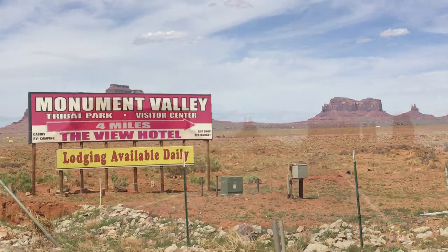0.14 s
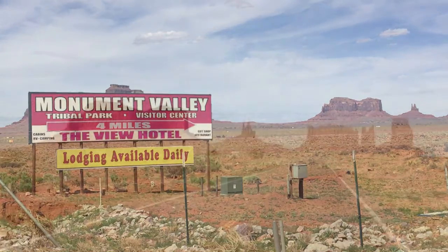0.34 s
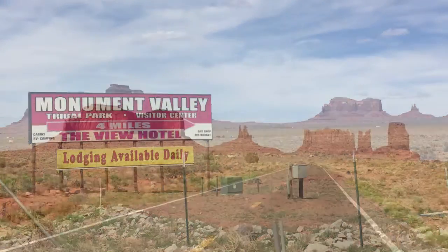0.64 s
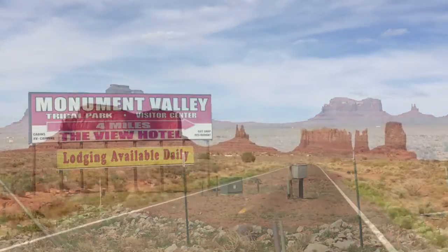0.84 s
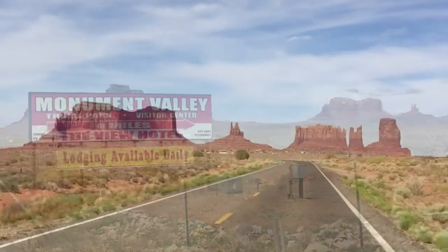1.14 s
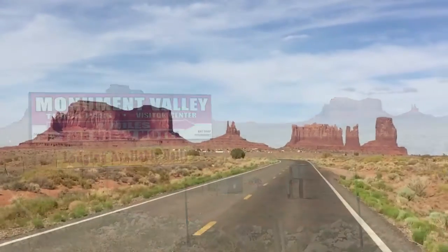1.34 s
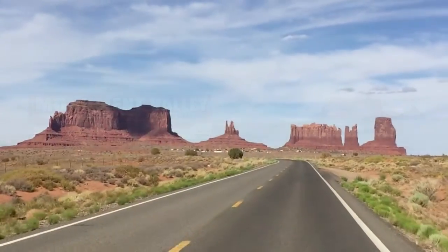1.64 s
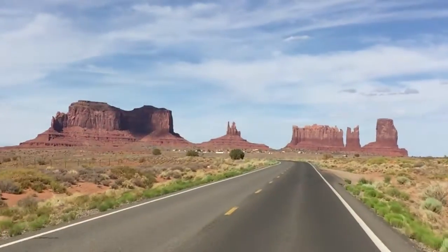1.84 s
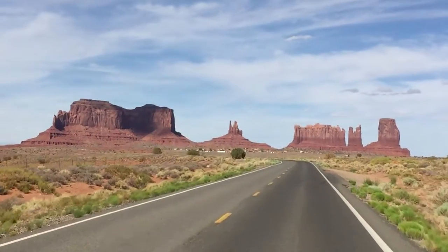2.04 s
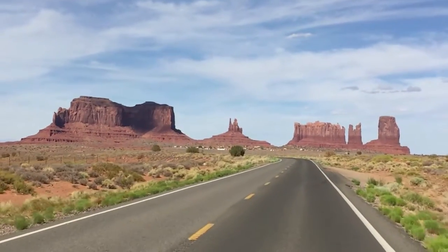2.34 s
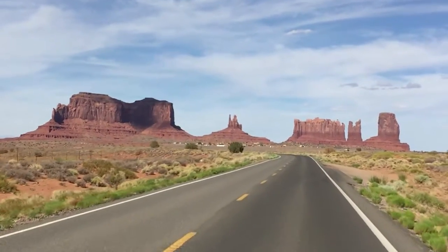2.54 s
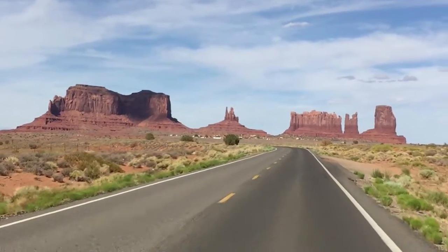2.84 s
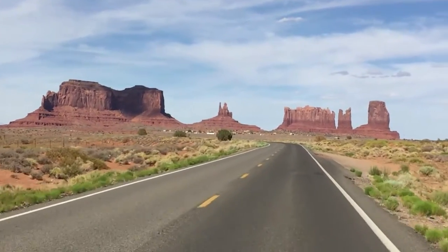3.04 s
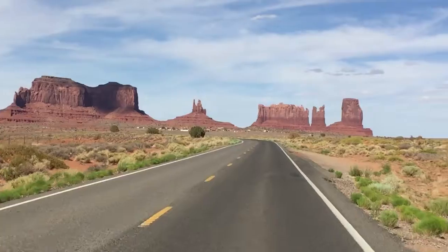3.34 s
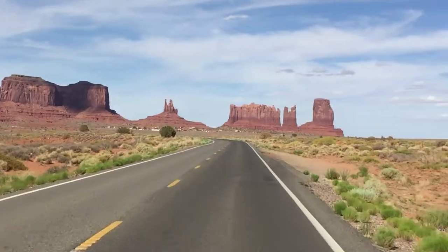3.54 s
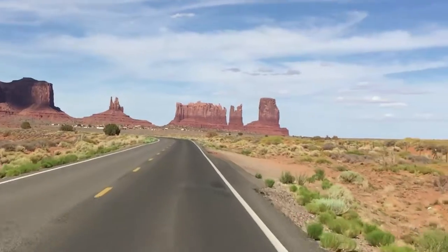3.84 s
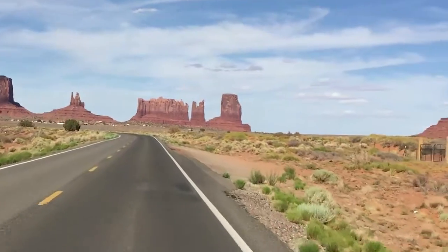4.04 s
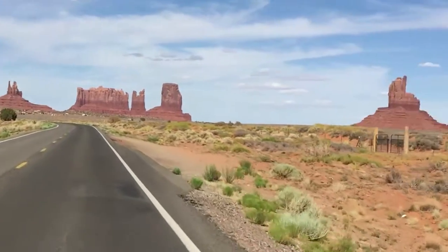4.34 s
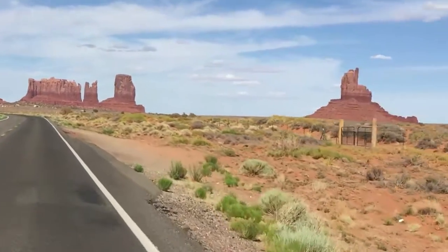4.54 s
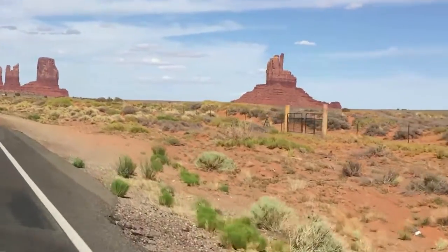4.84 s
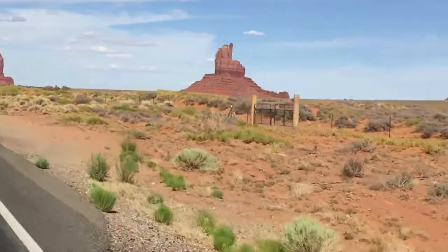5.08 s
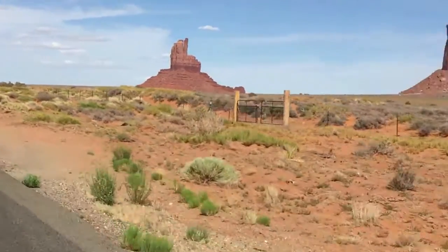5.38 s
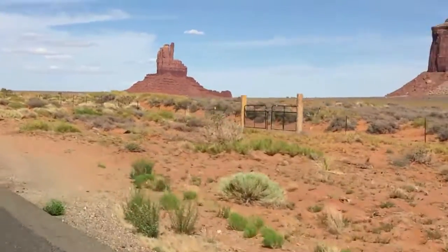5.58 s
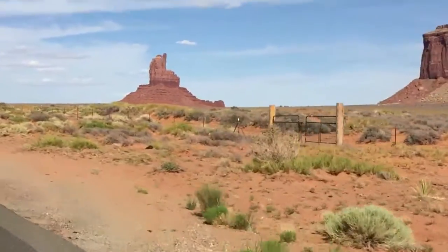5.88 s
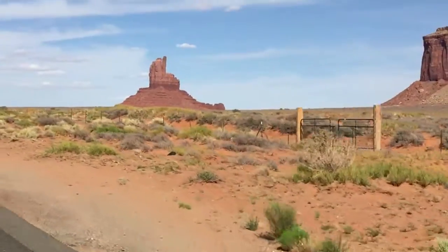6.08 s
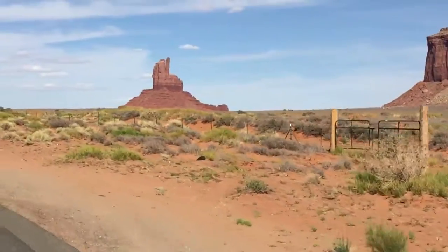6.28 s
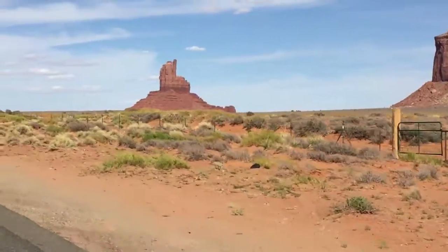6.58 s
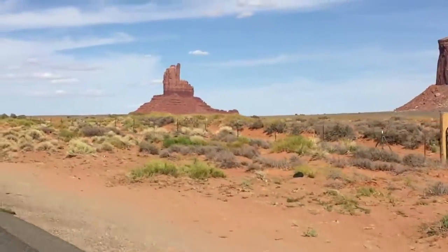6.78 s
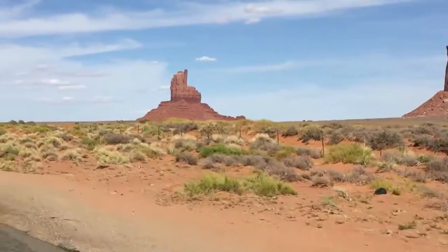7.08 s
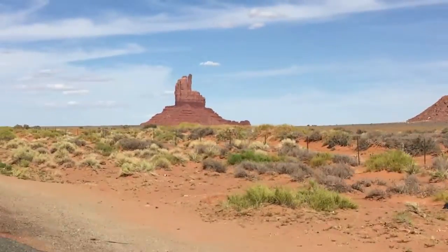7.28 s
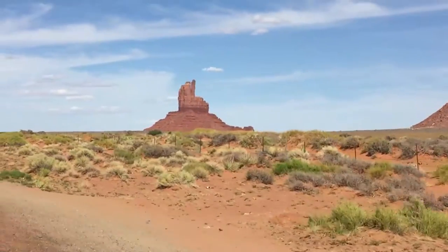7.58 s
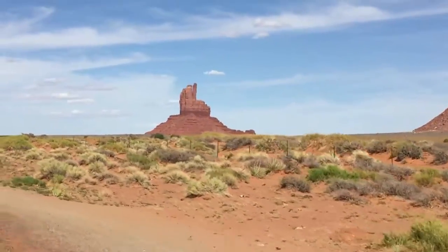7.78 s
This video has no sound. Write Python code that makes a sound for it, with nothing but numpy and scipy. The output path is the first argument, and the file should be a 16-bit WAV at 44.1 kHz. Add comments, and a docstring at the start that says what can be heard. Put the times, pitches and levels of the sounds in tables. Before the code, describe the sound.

From near silence a motorcycle cruising on an open desert road fades in, heard from the saddle: deep even exhaust throb, thin gear whine, tyre rush, bright engine hiss and low headwind, with a few small knocks. Past the middle the sound abruptly dulls and dips, then ragged wind gusts slap and crackle on the microphone over the weakened engine.

```python
"""On an open road, a V-twin motorcycle cruises along, heard from the saddle; the sound fades in.
The exhaust throb is a stack of steady tones tied to the engine speed, and so are the thin gear whines.
Tyre rush, engine hiss and headwind rumble are coloured noise; small knocks are dying tones.
Then the microphone swings to the side: the sound turns duller at once, the level dips and climbs back,
and wind buffets it in ragged gusts made of noise, tiny random pops and sharp dips of pressure."""
import sys
import numpy as np
from scipy import signal
from scipy.fft import rfft, irfft, next_fast_len
from scipy.io import wavfile
from scipy.ndimage import uniform_filter1d, minimum_filter1d

SR = 44100
rng = np.random.default_rng(int(sys.argv[2]) if len(sys.argv) > 2 else 0)


def to_wav(s):
    """Save 16-bit WAV."""
    ch = np.atleast_2d(s).T  # columns
    pcm = np.round(np.clip(ch, -1, 1) * 32767)  # PCM
    wavfile.write(sys.argv[1], SR, pcm.astype(np.int16))


N = 349124
TIME = np.arange(N) / SR
TURN_S = 4.392    # the microphone swings to the side

# Engine speed, a slight surge and then easing off.
# Each row: time in seconds, four-stroke cycles per second.
SPEED = [(1.7, 19.28), (3.3, 19.352), (4.6, 19.28), (6.3, 19.19), (7.45, 19.0), (7.92, 19.12)]


def from_db(db):
    """Turn decibels into a gain."""
    return 10 ** (np.asarray(db) / 20)


def rms_one(x):
    """Scale a signal so that its rms (its average strength) is 1."""
    return x / np.sqrt(np.mean(x ** 2) + 1e-20)


def in_time(rows):
    """Draw straight lines between the rows of a curve: one value per sample for each column after the time."""
    seconds, *columns = np.transpose(rows)
    return [np.interp(TIME, seconds, column) for column in columns]


def ramp(start_s, length_s):
    """Climb in a straight line from 0 to 1."""
    return np.clip((TIME - start_s) / length_s, 0, 1)


def turn_to_side():
    """Swing from 0 (facing forward) to 1 (facing sideways) in a hundredth of a second."""
    return np.clip((TIME - TURN_S) / .01 + .5, 0, 1)


def colour(x, spectrum):
    """Filter a signal by a spectrum, then scale it to unit rms."""
    size = next_fast_len(N)
    hz, db = np.transpose(spectrum)
    bins_hz = np.maximum(np.arange(size // 2 + 1) * SR / size, 1)
    gain = from_db(np.interp(np.log(bins_hz), np.log(hz), db))
    filtered = irfft(rfft(x, size) * gain, size)
    return rms_one(filtered[:N])


def noise(spectrum):
    """Make smooth noise of a given colour."""
    return colour(rng.standard_normal(N), spectrum)


def drift(rate_hz):
    """Wander at random, faster for a higher rate, with unit rms."""
    r = np.exp(-2 * np.pi * rate_hz / SR)
    # the first second is thrown away while the filter settles
    wander = signal.lfilter([1], [1, -2 * r, r * r], rng.standard_normal(N + SR))
    return rms_one(wander[SR:])


def swell(start_s, length_s, rise_s, fall_s):
    """Shape one push of air: it rises, holds for its length and dies away."""
    age = TIME - start_s
    rise = np.clip(age / rise_s + .5, 0, 1)
    fall = np.exp(-np.clip((age - length_s) / fall_s, 0, 20))
    return rise * fall


def bell(centre_s, half_s):
    """Make a smooth hump of height 1."""
    return np.exp(-np.minimum(((TIME - centre_s) / half_s) ** 2 / 2, 20))


def exhaust(cycle, uneven_db=0.5, flutter=0.13):
    """Two unevenly spaced firings and the ringing pipes time the harmonics, so the throb swells and dies."""
    # Exhaust note. Each row: multiple of the cycle rate, rms level in dB before the changes below.
    harmonics = [(2, -39), (3, -25), (4, -24), (5, -19), (6, -28), (7, -30), (8, -34.5), (9, -34),
                 (10, -30), (11, -42), (12, -38), (14, -49), (15, -50), (16, -47), (19, -42.5), (20, -44),
                 (21, -45)]
    # Resonances of pipe and silencer. Each row: pitch in Hz, width in Hz.
    resonances = [(103, 26), (111, 16)]
    # Changing level of the upper harmonics. Each row: time in seconds, change in dB.
    upper_curve = [(2.6, -5), (3.05, 0.5), (4.39, -0.5)]
    upper_from_order = 14
    firing_gap = 315 / 720    # delay of the rear cylinder, as a share of a cycle
    rear_share = .25          # strength of the rear cylinder against the front
    upper_db, = in_time(upper_curve)
    out = np.zeros(N)
    for order, db in harmonics:
        hz = order * SPEED[0][1]
        response = 1 + rear_share * np.exp(-2j * np.pi * order * firing_gap)
        for pipe_hz, width_hz in resonances:
            response = response / (1 + 1j * (hz ** 2 - pipe_hz ** 2) / (hz * width_hz))
        # only the timing (phase) comes from the response; the table sets the level
        phase = 2 * np.pi * order * cycle + np.angle(response)
        waver = 1 + flutter * order / 10 * drift(5.7)    # moving air disturbs the high orders most
        level_db = db + upper_db * (order >= upper_from_order)
        out += from_db(level_db) * waver * np.sqrt(2) * np.cos(phase)
    return out * from_db(uneven_db * drift(24))    # no two burns are alike


def road(cycle, throb_db=-0.5, patchy_db=1.3):
    """Tyres and passing air rush as coloured noise, swelling a little with each engine cycle."""
    # Colour of the rush. Each row: frequency in Hz, level in dB per Hz.
    rush_spectrum = [(40, -27), (150, -11.5), (260, -14), (330, -17.5), (470, -20.5), (620, -17),
                     (830, -26), (1050, -20.5), (1350, -23.5), (2000, -30.5), (2430, -34), (2620, -41.5),
                     (15000, -72)]
    return noise(rush_spectrum) * from_db(throb_db * np.sin(2 * np.pi * cycle) + patchy_db * drift(50))


def engine_chatter(cycle):
    """The engine hiss pulses once per cycle, and wavers at random."""
    hiss_peak = .04    # where in the cycle the hiss is strongest, as a share of a cycle
    pulse = np.cos(2 * np.pi * (cycle - hiss_peak))
    return from_db(1.0 * drift(60) + 0.83 * pulse)


def engine_hiss(chatter, hiss_db=-45):
    """The engine hisses as bright noise that pulses with its chatter."""
    # Colour of the hiss. Each row: frequency in Hz, level in dB per Hz.
    hiss_spectrum = [(1200, 4.5), (2150, -17), (2400, -6), (2650, -3.5), (3500, 1), (4000, 4.5),
                     (4300, 4.5), (4620, 0.5), (4900, -7.5), (5230, -1), (5900, -8), (6380, -9.5),
                     (6550, -2.5), (6720, -11), (8000, -9.5), (8800, -13), (9400, -11), (10500, -21),
                     (11200, -11.5), (12000, -11), (13500, -19), (15700, -20)]
    return from_db(hiss_db) * chatter * noise(hiss_spectrum)


def whines(cycle, waver_db=2.5, smear=1.0):
    """Meshing teeth sing at fixed multiples of the engine speed; backlash smears the high ones most."""
    # Gear, chain and valve-train whines. Each row: multiple of the cycle rate, rms level in dB before waver.
    steady_tones = [(23, -54), (26, -52), (28, -53), (30, -51), (32, -52), (33, -50), (34, -47.5),
                    (37, -54), (38, -53), (48, -57), (52, -53), (55, -55), (66, -54), (68, -50.5),
                    (155.7, -68), (192.5, -65), (205.9, -62), (217.3, -59.5), (222.6, -62.5), (267.9, -68),
                    (313.3, -74), (339, -69), (369.7, -76)]
    # The clearest gear whine as the load eases. Each row: time in seconds, rms level in dB before waver.
    gear_curve = [(1.4, -54.5), (2.0, -54), (2.7, -56), (3.3, -58), (3.8, -56), (4.39, -53.5)]
    # A humming overtone of the engine. Each row: time in seconds, rms level in dB before waver.
    hum_curve = [(1.5, -47), (2.05, -42.5), (2.6, -50), (3.2, -42), (3.8, -42.5), (4.39, -45)]
    gear_order, hum_order = 124.2, 31    # multiples of the cycle rate
    changing_tones = [(gear_order, in_time(gear_curve)[0]), (hum_order, in_time(hum_curve)[0])]
    out = np.zeros(N)
    for order, db in list(steady_tones) + changing_tones:
        phase = 2 * np.pi * order * cycle + smear * order / 200 * drift(14)
        out += from_db(db + waver_db * drift(11.0)) * np.sqrt(2) * np.sin(phase)
    return out


def headwind():
    """Air from ahead rumbles low on the microphone, at a level that follows a curve."""
    # Colour of the rumble. Each row: frequency in Hz, level in dB per Hz.
    headwind_spectrum = [(24, -57), (40, 1), (90, 6), (130, 0.5), (180, -1), (260, -12), (500, -51)]
    # Each row: time in seconds, rms level in dB.
    headwind_curve = [(1.5, -28.5), (2.6, -28), (3.0, -25), (3.4, -26), (3.65, -23.5), (4.1, -21.5),
                      (4.39, -24.5)]
    return from_db(in_time(headwind_curve)[0]) * noise(headwind_spectrum)


def pings():
    """Small knocks and metallic pings on the bike are each one dying tone."""
    # Each row: start in seconds, pitch in Hz, starting level in dB, time to fall by 60 dB in seconds.
    knocks = [(2.365, 2920, -41, .11), (2.41, 2640, -43, .11), (2.424, 2430, -38, .11),
              (2.555, 1680, -31.5, .11), (2.79, 420, -20.5, .05), (3.017, 231, -15, .12),
              (3.968, 596, -22, .05)]
    out = np.zeros(N)
    for start_s, hz, db, t60_s in knocks:
        age = np.maximum(TIME - start_s, 0)
        level_db = db - 60 * np.minimum(age / t60_s, 3)
        out += from_db(level_db) * np.sin(2 * np.pi * hz * age)
    return out


def bumps(rise_s=0.00065, fall_s=0.0011):
    """Stray eddies reach the port facing forward: filtered noise bursts knock, thud and flutter."""
    # Each row: start in seconds, length in seconds, level in dB, top edge in Hz.
    stray_eddies = [(2.787, 0.0047, -31, 2090), (2.794, 0.0052, -21, 430), (2.835, 0.014, -27, 1580),
                    (2.867, 0.087, -38, 1700), (3.017, 0.03, -22, 297), (3.242, 0.01, -27, 450),
                    (3.627, 0.005, -25, 790), (3.668, 0.019, -33, 1380), (3.671, 0.013, -24, 420),
                    (3.967, 0.005, -26, 1260), (4.006, 0.025, -28, 420), (4.092, 0.016, -29, 340)]
    low_hz = 156    # lower edge of every bump
    out = np.zeros(N)
    for start_s, length_s, db, top_hz in stray_eddies:
        band = signal.butter(2, [low_hz, max(top_hz, 1.5 * low_hz)], "band", fs=SR, output="sos")
        top = signal.butter(2, top_hz, fs=SR, output="sos")
        push = rng.standard_normal(N) * swell(start_s, length_s, rise_s, fall_s)
        burst = signal.sosfilt(np.vstack([band, top]), push)
        # scale the energy to that of a burst with unit rms over its length
        out += from_db(db) * burst * np.sqrt(length_s * SR / np.sum(burst ** 2))
    return out


def vortices(port_hz=90):
    """The core of a tight vortex sucks briefly at the port: one sharp dip of pressure, heard as a snap."""
    # Each row: time in seconds, depth in dB before the low cut, half width in seconds.
    cores = [(2.7877, -16, 0.00022), (2.796, -7, 0.00076), (2.8402, -24, 0.00021), (3.018, -20, 0.00095),
             (3.0343, -17, 0.00062), (3.6741, -2, 0.00029), (3.9708, -12, 0.0003), (3.974, -20, 0.00037),
             (4.8043, -7, 0.00048), (4.838, -13, 0.00025), (4.8847, -6, .0004), (5.0777, -10, 0.00025),
             (5.1187, -12, 0.00025), (5.3233, -6, .0003), (5.3643, -11, 0.00051), (5.78, -11, 0.0006),
             (5.8647, -12, 0.00013), (5.934, -5, 0.00088), (6.0837, -11, 0.00017), (6.2621, -12, .0003),
             (6.7448, -10, 0.00026), (6.8323, -9, 0.00045), (6.856, -10, 0.00031), (7.1036, -9, 0.00024),
             (7.1283, -6, 0.00018), (7.7472, -13, 0.00026)]
    dips = -sum(from_db(db) * bell(centre_s, half_s) for centre_s, db, half_s in cores)
    low_cut = signal.butter(1, port_hz, "high", fs=SR, output="sos")
    return signal.sosfilt(low_cut, dips)


def side_rush(eddies, windy, lee_db=-30.0, lee_windy_db=-3.5, lee_eddy_db=2.5):
    """Air at the side rushes smoothly as coloured noise, giving way to buffeting as the wind builds."""
    # Colour of the air. Each row: frequency in Hz, level in dB per Hz.
    side_spectrum = [(24, -29), (45, 6.5), (350, 4), (600, 1), (1200, -1.5), (2000, -12.5), (3000, -24.5),
                     (5000, -58), (12000, -74)]
    return from_db(lee_db + lee_windy_db * windy + lee_eddy_db * eddies) * noise(side_spectrum)


def dull_hiss(chatter, dip_db, faint_db=-58, faint_dip=0.65):
    """The engine hiss stays faintly audible at the side, following part of the dip after the turn."""
    # Colour of the faint hiss. Each row: frequency in Hz, level in dB per Hz.
    faint_spectrum = [(2000, -6), (4200, 8.5), (4550, 4.5), (4880, -2), (5200, 4), (6200, -6), (6550, -5),
                      (6800, -9), (8600, -15), (9450, -6), (10400, -12.5), (11250, -7.5), (11700, -12),
                      (12200, -7), (13500, -24), (15500, -18)]
    level_db = faint_db + faint_dip * dip_db + 1.4 * drift(8.7)
    return from_db(level_db) * chatter * noise(faint_spectrum)


def sputter(per_s=1800, smooth_share=0.55):
    """Tiny eddies burst on the port as random pops, over a smoother flow of noise."""
    pops = (rng.random(N) < per_s / SR) * rng.choice([-1, 1], N)
    return rms_one(pops) + smooth_share * rng.standard_normal(N)


def gusts(strength_db=-9.0, breeze_db=-28):
    """Gusts add their power to a steady breeze; the result is the wind strength in dB."""
    # Each row: start in seconds, length in seconds, level in dB before the overall strength is added.
    gust_list = [(4.767, 0.26, -23), (5.075, 0.1, -30), (5.27, 0.048, -17.5), (5.504, 0.14, -15.5),
                 (5.762, 0.032, -19), (5.827, 0.41, -18.5), (6.578, 0.089, -28), (6.818, 0.21, -16.5),
                 (6.98, 0.1, -16.5), (7.443, 0.11, -28), (7.642, 0.14, -18), (7.81, 0.019, -21)]
    rise_s, fall_s = 0.05, 0.015
    power = from_db(breeze_db) ** 2
    for start_s, length_s, db in gust_list:
        power = power + (from_db(db + strength_db) * swell(start_s, length_s, rise_s, fall_s)) ** 2
    return 10 * np.log10(power)


def wind(eddies, rumble_db=-24.5, roar_db=-4.0, eddy_db=4.5, crowding=0.016, tear_db=-35.5, tear_from_db=-18):
    """Eddies cross the microphone port: a lumpy rumble, a ragged roar, and a tearing edge in hard gusts."""
    # Colours of rumble, roar and tearing edge. Each row: frequency in Hz, level in dB per Hz.
    rumble_spectrum = [(24, -45), (40, -0.5), (80, 4.5), (170, -3), (300, -3.5), (500, -17), (900, -29),
                       (2000, -71)]
    roar_spectrum = [(60, -25), (200, 12.5), (400, 8), (700, 7.5), (1050, 4), (1500, -3.5), (2100, -15),
                     (3000, -32), (4500, -65), (7000, -68), (14000, -80)]
    tear_spectrum = [(500, -9), (2200, 14), (3500, 0), (5000, -18.5), (7000, -28), (10000, -50),
                     (15000, -61)]
    gust_db = gusts()
    excess_db = gust_db - np.median(gust_db[TIME > TURN_S])
    rumble = from_db(rumble_db + 0.27 * excess_db + 1.9 * drift(19.5)) * noise(rumble_spectrum)
    grains = sputter()
    ragged_db = eddy_db * (1 - crowding * excess_db)    # in strong gusts the eddies crowd together
    flow = from_db(gust_db + roar_db + ragged_db * eddies)
    # hard eddies steepen into sharp edges, so the treble grows faster than the roar, up to a limit
    edge = from_db(tear_db) * 2 * np.tanh((flow / from_db(tear_from_db)) ** 2 / 2)
    return rumble + flow * colour(grains, roar_spectrum) + edge * colour(grains, tear_spectrum)


def slaps(slap_db=-0.65, slap_edge_db=2.5, crackle_db=3.0):
    """Each buffet of side wind strikes abruptly, holds and is gone: quick cracks, roaring and tearing."""
    # Each row: start in seconds, length in seconds, roar in dB, tearing edge in dB (both before the trims).
    buffets = [(4.777, 0.018, -21.5, -50), (4.824, 0.0032, -20, -42), (4.833, 0.03, -22.5, -41.5),
               (4.867, 0.031, -19.5, -38), (4.91, 0.017, -26, -47), (4.929, 0.011, -20, -48),
               (4.97, 0.031, -23, -49), (5.075, 0.025, -21.5, -49), (5.11, 0.021, -20.5, -50),
               (5.159, 0.01, -26.5, -53), (5.303, 0.0093, -22, -55), (5.314, 0.015, -23, -41.5),
               (5.339, 0.04, -22, -50), (5.472, 0.0063, -26, -51), (5.516, 0.0066, -24.5, -48),
               (5.546, 0.0088, -25, -55.5), (5.565, 0.017, -21.5, -44), (5.622, 0.026, -23.5, -49),
               (5.669, 0.014, -25.5, -53), (5.692, 0.0089, -22, -49), (5.71, 0.0056, -22.5, -42.5),
               (5.776, 0.026, -25.5, -46), (5.834, 0.034, -22, -45), (5.88, 0.025, -21.5, -43),
               (5.912, 0.025, -17.5, -40.5), (5.96, 0.0087, -22, -54), (5.98, 0.014, -37, -40.5),
               (6.011, 0.0046, -25, -48), (6.033, 0.0077, -17.5, -42), (6.054, 0.011, -22, -48),
               (6.074, 0.016, -18, -34.5), (6.131, 0.015, -19.5, -42.5), (6.155, 0.042, -23.5, -45.5),
               (6.203, 0.023, -21.5, -46.5), (6.251, 0.023, -22.5, -51), (6.28, 0.017, -23.5, -51),
               (6.377, 0.0048, -27, -59), (6.445, 0.0066, -26, -63), (6.523, 0.0069, -23, -56),
               (6.548, 0.0041, -25, -57), (6.586, 0.0066, -21.5, -55), (6.638, 0.0087, -21, -54),
               (6.665, 0.0049, -18, -56), (6.74, 0.004, -22, -40), (6.797, 0.012, -25.5, -55),
               (6.83, 0.029, -15, -34.5), (6.86, 0.028, -20, -39), (6.903, 0.022, -21, -47),
               (6.938, 0.01, -18, -44), (6.961, 0.0063, -20, -46), (7.024, 0.008, -24, -50),
               (7.045, 0.012, -19, -41), (7.092, .012, -23, -43), (7.097, 0.024, -17, -34),
               (7.122, 0.011, -12, -37), (7.135, 0.02, -23, -49), (7.218, 0.014, -24.5, -67),
               (7.439, 0.013, -21.5, -49), (7.469, 0.007, -21.5, -47), (7.52, 0.01, -21, -64),
               (7.632, 0.013, -20, -46.5), (7.662, 0.012, -23, -53), (7.687, 0.016, -23, -59),
               (7.729, 0.025, -19, -38), (7.83, 0.014, -23, -47.5)]
    # Colours of roar and tearing edge. Each row: frequency in Hz, level in dB per Hz.
    slap_roar_spectrum = [(60, -9.5), (200, 12), (400, 8.5), (700, 6), (1050, 4.5), (1500, -1.5),
                          (2100, -11.5), (3000, -35), (4500, -69)]
    slap_tear_spectrum = [(500, -8.5), (2200, 10), (3500, 0.5), (5000, -15.5), (7000, -24), (10000, -41),
                          (15000, -58)]
    rise_s, fall_s = .0012, .0022
    roar, edge = np.zeros(N), np.zeros(N)
    for start_s, length_s, roar_db, edge_db in buffets:
        push = swell(start_s, length_s, rise_s, fall_s)
        roar = np.maximum(roar, from_db(roar_db) * push)
        edge = np.maximum(edge, from_db(edge_db) * push)
    cracks = sputter(per_s=1000, smooth_share=0.4)
    crackle = from_db(crackle_db * np.minimum(drift(170), 2))
    low = from_db(slap_db) * roar * np.sqrt(crackle) * colour(cracks, slap_roar_spectrum)
    high = from_db(slap_edge_db) * edge * crackle * colour(cracks, slap_tear_spectrum)
    return low + high


def lulls():
    """The side wind lets go of the port for a moment; this is its gain."""
    # Each row: time in seconds, half width in seconds, change in dB.
    lull_list = [(4.812, 0.0045, -9), (4.946, 0.0048, -5), (5.068, 0.0075, -4.5), (5.146, 0.0097, -6.5),
                 (5.297, 0.0036, -3), (5.394, 0.0066, -3), (5.508, .004, 0), (5.663, 0.0036, -4),
                 (5.745, 0.0093, -2.5), (5.828, .005, -6), (5.95, 0.0062, -4), (6.004, 0.0035, -6),
                 (6.055, .004, -3), (6.435, 0.0091, -8), (6.515, 0.0066, -12), (6.735, 0.0042, -3),
                 (6.785, 0.012, -4.5), (6.825, .004, -1), (6.933, 0.0026, -6), (7.175, .014, -6),
                 (7.214, 0.0025, -0.5), (7.43, 0.0041, -5), (7.775, 0.0037, -5), (7.858, .005, -8)]
    return from_db(sum(db * bell(centre_s, half_s) for centre_s, half_s, db in lull_list))


def scene(road_db=-32.5, whine_db=-1.5, whine_drop_db=-14, side_exhaust_db=-7):
    """Mix the bike: bright and deep facing forward, dull and wind-blown facing sideways."""
    # How strongly the bike reaches the forward-facing microphone.
    # Each row: time in seconds, exhaust in dB (only half of it is used), road and engine noise in dB.
    bike_curve = [(1.8, 0.5, 1.7), (2.9, -0.3, 2.3), (3.25, 2.5, 2.5), (3.75, 1.5, -0.1),
                  (4.39, -2.5, -1.5)]
    first_firing = .24    # when the front cylinder first fires, as a share of a cycle
    cycle = np.cumsum(in_time(SPEED)[0]) / SR - first_firing
    exhaust_db, noise_db = in_time(bike_curve)
    turned = turn_to_side()
    dip_db = -13 * (1 - ramp(TURN_S, 0.8))    # just after the turn the level dips and climbs back
    windy = ramp(4.58, 0.12)                  # the wind builds up on the port
    lull = lulls()
    eddies = np.clip(0.81 * drift(45) + 0.6 * drift(180), -2.4, 1.5)    # large and small eddies together
    chatter = engine_chatter(cycle)

    # half of the exhaust curve is added ahead; at the side half of its last value is taken off
    throb_db = (0.5 - turned) * exhaust_db + turned * (side_exhaust_db + dip_db)
    throb = from_db(throb_db) * exhaust(cycle)
    gears = from_db(noise_db + whine_db + whine_drop_db * turned) * whines(cycle)
    bike_noise = from_db(road_db) * road(cycle) + engine_hiss(chatter)
    forward = from_db(noise_db) * bike_noise + headwind()
    sideways = lull * side_rush(eddies, windy) + dull_hiss(chatter, dip_db)
    air = bumps() + vortices() + windy * lull * wind(eddies) + slaps()
    mix = throb + gears + pings() + (1 - turned) * forward + turned * sideways + air
    return mix[None]    # one channel


def record(dry):
    """A limiter holds down the loudest peaks; then come the fade-in and the top cut."""
    ceiling, cutoff_hz = .56, 15600
    needed = np.minimum(1, ceiling / (np.abs(dry) + 1e-9))
    gain = uniform_filter1d(minimum_filter1d(needed, size=301), size=301)
    faded = dry * gain * ramp(0.78, 0.96)    # silent until 0.78 s, then a straight climb of 0.96 s
    top_cut = signal.ellip(12, .1, 90, cutoff_hz, fs=SR, output="sos")
    return signal.sosfilt(top_cut, faded)


dry = scene()
out = record(dry)
to_wav(out)
```